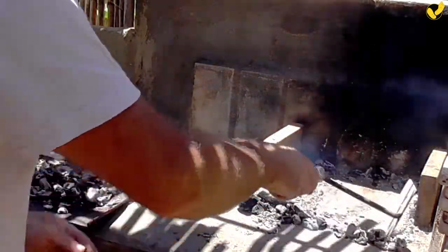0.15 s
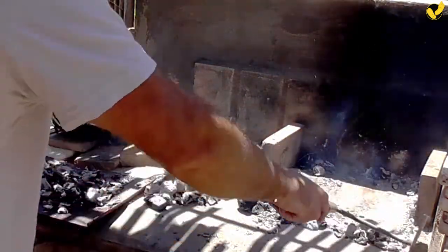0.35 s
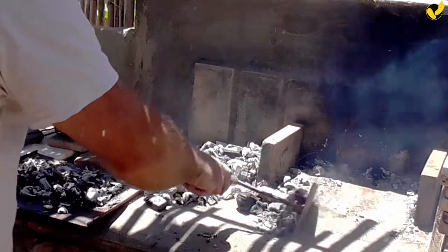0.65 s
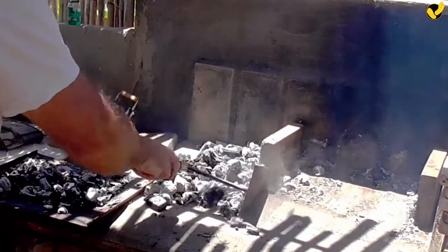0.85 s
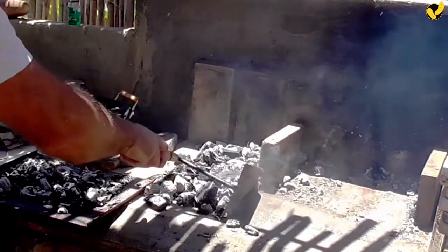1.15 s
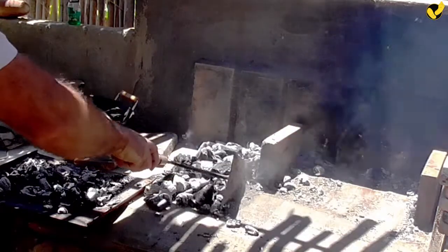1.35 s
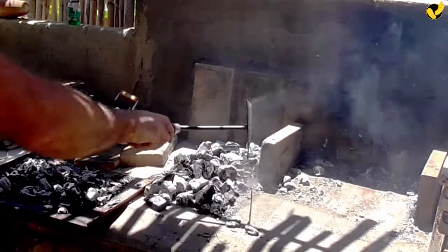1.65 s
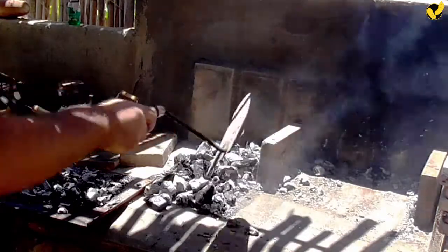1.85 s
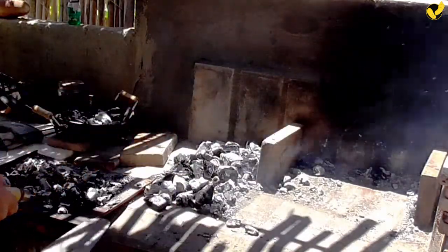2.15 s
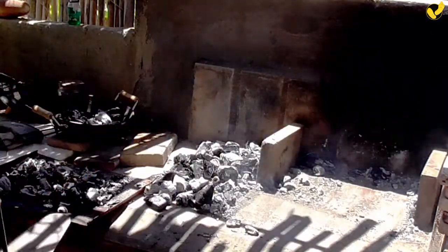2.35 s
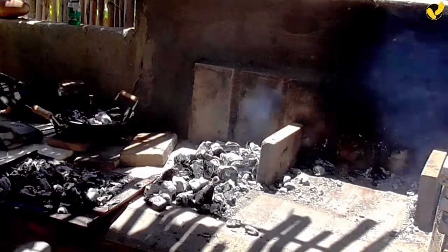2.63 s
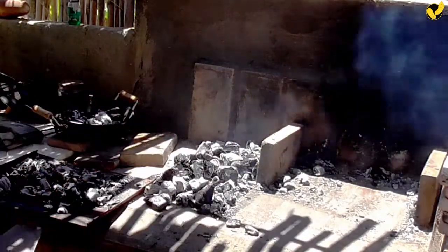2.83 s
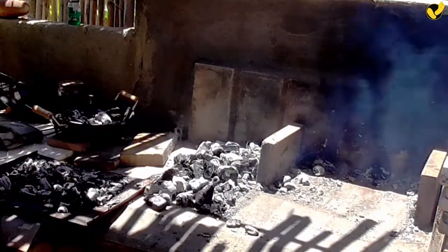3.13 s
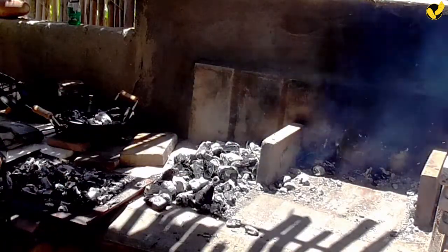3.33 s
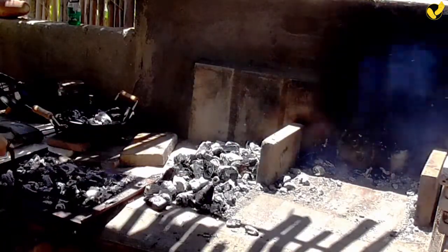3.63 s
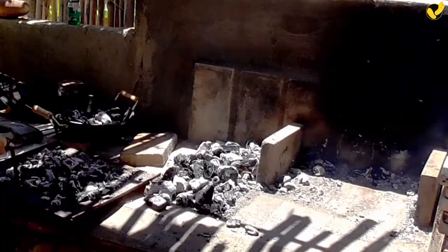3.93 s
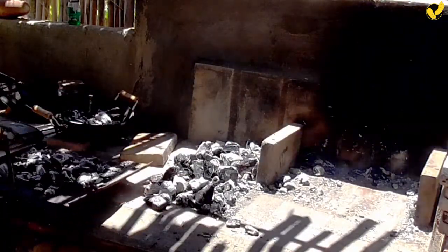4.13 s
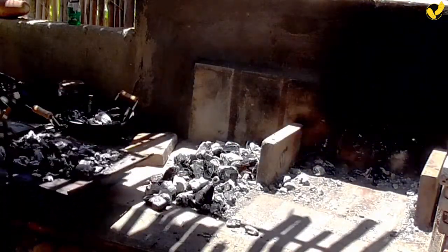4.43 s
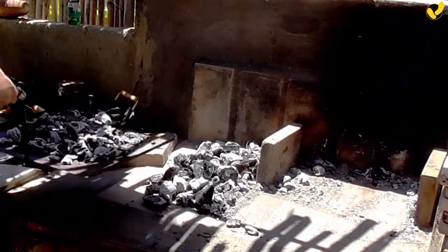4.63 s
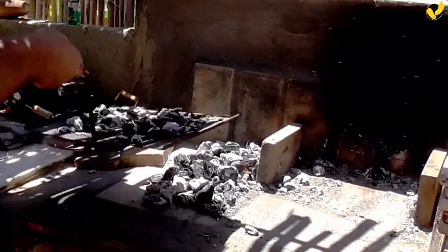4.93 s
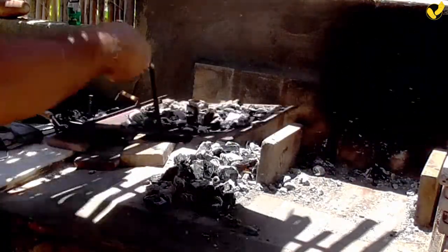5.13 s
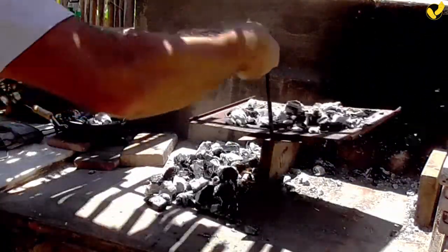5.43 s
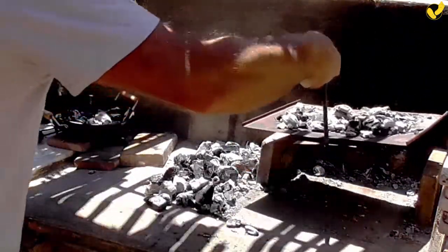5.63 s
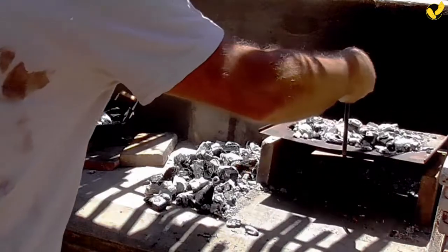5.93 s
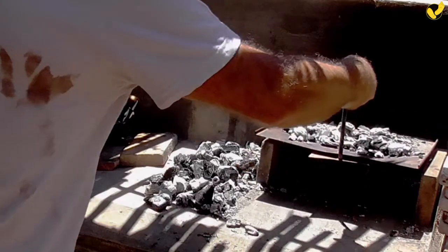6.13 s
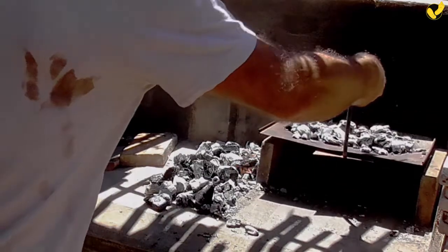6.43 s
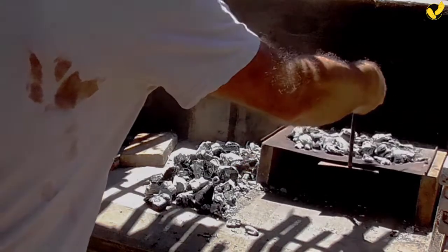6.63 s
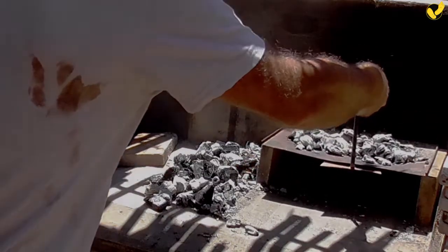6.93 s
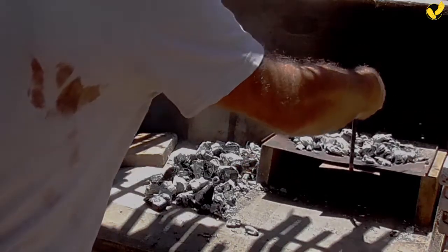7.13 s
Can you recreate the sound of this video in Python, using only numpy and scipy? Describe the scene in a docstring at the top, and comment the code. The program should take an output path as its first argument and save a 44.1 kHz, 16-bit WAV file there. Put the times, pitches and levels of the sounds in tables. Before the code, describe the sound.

Close stereo sound of a charcoal hearth outdoors, with very short diffuse reflections from brick walls. Sharp, dry coal pops of varied size run throughout, over fine ticking crackle and faint ember hiss. From 0.4 to 1.0 s a steel blade scrapes over gritty masonry, uneven, rasping and ringing, with brief squeaky tones. Pops continue alone until about 2.2 s, when the hoe is laid down with a bright clank, followed by a faint drag to 2.7 s. From 3.0 to 3.9 s it slides aside in small scrapes and clinks. Crackling surges near 4.0 s and is densest from 4.7 to 5.5 s, with short gas spits, then thins. At 6.3-6.75 s a steel tray meets bricks: dull low knocks and a short grating push. Sparse pops finish. A quiet, wavering mid-low machine hum and soft yard rumble sit beneath everything.

```python
"""Burning charcoal pops and crackles on a brick hearth outdoors: each pop is a sharp spike with its own echo, the
crackles are random ticks over hiss, and split coals spit jets of shaped noise.
A steel hoe is dragged over the hearth, laid down and slid aside, and a steel tray is set on two bricks: grit and
pushes ring their modes. The hearth walls answer crackles and steel with a diffuse tail.
A machine hums nearby on two tones and a noise drone, over a dull rumble from the yard."""
import sys
import numpy as np
from scipy import signal
from scipy.fft import rfft, irfft, next_fast_len
from scipy.io import wavfile
from scipy.ndimage import map_coordinates

SR = 44100
rng = np.random.default_rng(int(sys.argv[2]) if len(sys.argv) > 2 else 0)


def master_out(mix):
    """Clip the mix to full scale and print it as 16-bit PCM to the path in sys.argv[1]."""
    frames = np.transpose(np.atleast_2d(mix))
    ceiling = np.clip(frames, -1, 1)
    pcm = np.round(ceiling * 32767).astype(np.int16)
    wavfile.write(sys.argv[1], SR, pcm)


N = 320607

# Outdoor rumble, relative spectrum: pitch_hz, level_db (per Hz)
YARD_SPECTRUM = [(12, -53), (20, -26.5), (71, -9), (201, -8.5), (292, -1.5), (436, -4), (487, -7),
                 (556, -12), (1320, -23), (1760, -35), (2060, -26.5), (2810, -36.5), (4000, -32),
                 (5200, -67), (8800, -120)]
YARD_DB = -45  # rms
# Machine: time_s, lower_tone_db, upper_tone_db, housing_drone_db
HUM_LEVELS = [(0.0, -56, -51, -48), (0.58, -54, -51, -52.5), (1.07, -66, -49.5, -45.5),
              (1.88, -51.5, -51.5, -44.5), (2.81, -58, -54.5, -46.5), (5.51, -43.5, -55, -44.5),
              (6.76, -48.5, -54.5, -47), (7.27, -46, -58, -47)]

# Likeness of the two microphones: pitch_hz, correlation (0 to 1)
LIKENESS = [(60, 0.72), (180, 0.94), (550, 0.42), (1650, 0.55), (4970, 0.27), (15000, 0.041)]
# Colour difference of the microphones: pitch_hz, left_minus_right_db
MIC_TILT = [(60, -1), (180, -2), (550, 2.5), (1650, -0.5), (4970, 0), (15000, -3)]
TOP_HZ = 16800  # band limit
# Decay of the hearth walls: pitch_hz, t60_s
WALL_DECAY = [(500, 0.06), (2500, 0.049), (7000, 0.1), (15000, 0.082)]

# Steel modes, relative: pitch_hz, width_hz, level_db
BLADE_ON_EDGE = [(2547, 34, -3), (3020, 18, -2.5), (3230, 10, -12), (3580, 19, -11), (3880, 18, -1),
                 (4624, 16, 2), (5310, 28, 0), (5460, 16, 3), (6680, 33, -4), (7700, 32, 1), (8800, 31, 1),
                 (9200, 58, -6)]
BLADE_FLAT = [(1342, 67, -3.5), (2176, 26, -8), (2980, 29, -40), (3570, 29, -3), (4560, 30, -1),
              (5210, 54, -4), (5900, 57, -20), (7830, 250, 5.5), (8790, 33, -1), (9650, 25, -3),
              (9350, 43, 4)]
TRAY_MODES = [(252, 44, -7.5), (416, 106, 2), (570, 130, 3), (930, 320, 4), (1160, 150, -7)]
# Rasp of grit under steel, relative spectrum: pitch_hz, level_db (per Hz)
GRIT_SPECTRUM = [(180, -22), (300, -11), (549, -10), (1130, -9.5), (1230, -10), (1630, -17), (9020, -17),
                 (14700, -21), (15700, -50), (16500, -75)]
# Strokes of moving steel, before the steel trim: time_s, lows_db, treble_db
RAKE_STROKE = [(.399, -24.5, -35), (.458, -53, -44), (.488, -33.5, -42.5), (.535, -28, -30.5),
               (.56, -32.5, -33.5), (.575, -29, -30.5), (.61, -30, -34.5), (.652, -24, -36.5),
               (.742, -33.5, -35.5), (.8, -44.5, -49.5), (.845, -39.5, -36), (.878, -43, -40.5),
               (.888, -35, -37.5), (.93, -46, -50.5), (1.02, -69, -69)]  # blade dragged over the hearth
DROP_STROKE = [(2.205, -50, -53), (2.212, -38, -32), (2.228, -46, -43), (2.24, -25.5, -25.5),
               (2.275, -29, -28.5), (2.345, -36.5, -42.5), (2.42, -54, -60)]  # hoe laid down
DRAG_STROKES = [
    [(2.42, -46, -61), (2.51, -54, -50), (2.61, -49, -60), (2.72, -72, -65)],
    [(2.98, -63, -50), (2.998, -30.5, -33.5), (3.036, -51, -49), (3.056, -35, -41), (3.1, -44, -47),
     (3.2, -41.5, -39), (3.3, -39, -38.5), (3.412, -44.5, -44), (3.48, -55.5, -62), (3.56, -46, -41.5),
     (3.66, -41.5, -40.5), (3.716, -44, -49), (3.78, -31, -36), (3.87, -48, -55), (3.92, -72, -66)],
]  # hoe slid aside, a list for each stroke
SLIDE_STROKES = [
    [(6.4, -44, -53), (6.435, -51, -53.5), (6.45, -65, -63)],
    [(6.622, -55, -60), (6.628, -34, -33.5), (6.66, -37.5, -42.5), (6.69, -36, -41), (6.715, -41.5, -54),
     (6.735, -51, -37), (6.76, -67, -66)],
]  # tray pushed over the bricks, a list for each stroke
# Steel meets brick: start_s, relative level_db, contact_ms
BRICK_KNOCKS = [(.402, -29, 1.4), (3.097, -26, 1.2), (6.341, -22, 1.02), (6.402, -17.5, 1.67),
                (6.6271, -18.5, 0.8), (6.6416, -21, 1.65), (6.677, -30, 1.4), (6.7252, -14.5, 0.88),
                (6.7328, -34, 1.2)]
THUMP = 0.29  # share of the push itself, beside a ring of peak 1
# Modes of the hoe that sing out: pitch_hz, width_hz
SINGING_MODES = [(545, 33), (760, 25), (835, 55), (1242, 13.8), (1560, 8), (1744, 11), (8780, 36)]
# Catches of the edge, a list for each singing mode, before the steel trim: start_s, level_db, hold_s
EDGE_CATCHES = [
    [(.622, -29.5, 0.064), (.93, -42.5, 0.019)],
    [(0.546, -38, .06)],
    [(2.24, -28.5, 0.034), (2.275, -30.5, .04), (2.43, -39.5, .015), (2.45, -39.5, 0.017),
     (2.55, -42, 0.035), (2.6, -37, 0.013), (2.998, -32.5, 0.0041), (3.056, -31.5, .012),
     (3.29, -39.5, 0.039), (3.4, -44.5, 0.04), (3.56, -44.5, .03), (3.6, -41, 0.02), (3.652, -34, 0.011),
     (3.69, -38, .008), (3.77, -34.5, 0.016)],
    [(.4, -31, 0.0052), (.486, -34, .01), (.522, -32, .015), (.569, -25.5, 0.038), (.688, -40, .006),
     (.884, -32, 0.015), (.94, -48, 0.023)],
    [(0.882, -40, 0.075)],
    [(0.487, -37, 0.074)],
    [(2.24, -34, .02), (2.272, -34, .012)],
]
SWELL_DB_PER_S, FADE_DB_PER_S = 3500, 500
LOCKED = 0.73  # power share of the singing that stick and slip turns into a tone
STEEL_DRY_DB, STEEL_WALLS_DB = -2.0, -2.5  # steel trim in the mix

# Small crackles: time_s, level_db (rms)
CRACKLE_LEVELS = [(0, -51), (.3, -66), (.4, -60), (.95, -58), (1.114, -52), (1.508, -45), (1.76, -57),
                  (2.146, -54.5), (2.4, -49), (2.764, -49.5), (2.97, -51.5), (3.9, -51.5), (4.0, -41.5),
                  (4.22, -52.5), (4.6, -58), (4.93, -43.5), (5.07, -42.5), (5.19, -51.5), (5.37, -46.5),
                  (5.55, -50.5), (6.35, -59), (7.27, -51)]
# Colour laid over crackles and hiss, relative: pitch_hz, level_db
CRACKLE_COLOUR = [(530, 3.5), (900, 4), (1520, 2), (1740, -8.5), (5130, 0), (5790, -1.5), (11900, 0.5),
                  (14800, -5.5), (16500, -72)]
# Gas jets from split coals: start_s, level_db, length_ms, low_part_db (relative)
GAS_JETS = [(3.37, -28.5, 15, -2), (3.968, -30.5, 19.5, -6), (4.262, -40, 11, -18),
            (4.7896, -28.5, 6.3, -24), (5.093, -36, 12, -12), (6.078, -39, 7.5, 9), (7.143, -39, 9.5, -20),
            (7.215, -35.5, 16, -31)]
# Bursting coals: start_s, spike_db (peak, before panning), body_db (relative to the snap), echo_db (relative to the spike)
COAL_BURSTS = [(.0197, -9.5, -22, -20), (.1946, -27, -2, -8), (.265, -12, -28, -19.5), (.284, -8, -20, -27),
               (0.3192, -13.5, -3, -20.5), (0.4005, -10.5, 0.5, -9.5), (.424, -9, -17, -17.5),
               (.5332, -15.5, -3, -16), (0.658, -20, 16, -14), (.6906, -19, 20, -16),
               (.77, -3.5, -7.5, -18.5), (0.775, -13, 3, -30), (0.883, -24.5, -27, -5),
               (0.961, -20, -4, -24), (1.039, -14.5, -29, -38), (1.076, -23.5, -9, -19),
               (1.1238, -19.5, -20, -37), (1.139, -28.5, 1, -9), (1.2005, -13.5, -11, -27),
               (1.424, -30, 5, -7.5), (1.461, -18, -29, -39), (1.505, -17.5, -23, -26),
               (1.6274, -12.5, -8, -17), (1.656, -21, -22, -38), (1.7098, -12, -5.5, -25.5),
               (1.7846, -15, -16, -29), (1.7993, -18.5, -3, -9.5), (1.9021, -10, -22, -26.5),
               (1.9172, -17, 2, -13), (2.0934, -9.5, -10, -22), (2.21, -11, -4, -15), (2.2394, -19, -5, -8),
               (2.2989, -10, -16, -22), (2.4495, -6, -22, -27), (2.5579, -24, -1, -9.5),
               (2.5795, -17, 3, -21), (2.6095, -20, 8, -21), (2.6271, -5, -1.5, -21.5),
               (2.662, -12, -9, -23), (2.698, -18.5, -11, -19), (2.738, -20.5, -6, -20),
               (2.7711, -22, -4, -12.5), (2.8184, -9, -8, -23), (2.8494, -18.5, -16, -23),
               (2.9137, -20.5, -16, -32), (2.9644, -14.5, -17, -25), (2.9974, -14, 10, -16),
               (3.0206, -9, -13, -18), (3.0803, -12, -11, -40), (3.0977, -6, -22, -23),
               (3.147, -9.5, -9, -25), (3.166, -18.5, -11, -20), (3.2072, -11, -8, -17),
               (3.2392, -9, -17, -21.5), (3.3728, -17.5, 6, -6.5), (3.5558, -9, -13, -29),
               (3.6637, -18, 1, -4.5), (3.8213, -8.5, -9, -18.5), (3.877, -21, 0, -22),
               (3.97, -20.5, 4, -8), (3.9854, -9, -17, -27), (4.0429, -16, -5, -10), (4.0874, -8, -16, -23),
               (4.177, -4.5, -11, -26), (4.1983, -24, -26, -30), (4.4005, -15.5, 1, -28),
               (4.419, -26, -17, -15), (4.4604, -23.5, -16, -21), (4.5319, -6.5, -8, -21),
               (4.5574, -17, -6, -20.5), (4.572, -22, -1, -30), (4.6075, -6.5, -8, -22),
               (4.6527, -22.5, -7, -18.5), (4.7276, -30, -12, -14), (4.7385, -13.5, -15, -17.5),
               (4.7823, -19.5, -17, -6.5), (4.7875, -15, 4, -3.5), (4.7928, -20, -17, -13),
               (4.851, -30, -20, -12.5), (4.8894, -20, -3, -14), (4.894, -12.5, -10, -20),
               (4.9108, -19, 4, -16), (4.9195, -20, -8, -15.5), (4.9334, -16, -3, -17),
               (4.9642, -18.5, -8, -13), (4.9817, -19, -9, -14), (5.0209, -19, -1, -14),
               (5.045, -16.5, -12, -25), (5.0583, -19.5, -2, -10.5), (5.069, -11.5, -15, -26),
               (5.162, -21, -13, -19), (5.188, -26, -14, -10), (5.224, -19, -5, -19),
               (5.2891, -14.5, -21, -24), (5.3564, -20.5, -1, -15.5), (5.3932, -19.5, -18, -20.5),
               (5.4514, -14.5, 8, -24), (5.464, -14.5, -2, -19), (5.493, -13, -7, -25),
               (5.5196, -21.5, 6, -21), (5.5375, -20, -4, -22), (5.7373, -26, -8, -4),
               (5.8112, -23, -12, -24), (5.8466, -28.5, -10, -13.5), (5.8804, -23.5, -7, -21),
               (5.97, -19.5, 1, -7.5), (5.974, -11, 0, -26), (6.003, -19.5, -10, -14),
               (6.0785, -13.5, -11, -10), (6.0937, -11, -15, -18), (6.211, -29, -10, -6.5),
               (6.341, -35.5, 8, -6), (6.355, -22, -14, -20), (6.567, -26, -29, -11.5),
               (6.6288, -21.5, 16, -10.5), (6.7311, -16.5, -14, -6), (6.7367, -8.5, -19, -19.5),
               (6.795, -35, -10, -7), (6.954, -19.5, -19, -23), (7.0119, -30, -14, -16),
               (7.0997, -12, -15, -27), (7.2153, -27, 12, -6.5)]
# Colour of a pop, relative: pitch_hz, level_db, share of body_db added (0 to 1)
SNAP_COLOUR = [(500, -3, 0.8), (1840, -6.5, 0.97), (3820, -2.5, 0.3), (7900, 0.5, .01), (11660, 2, 0.37),
               (15500, -7, 0.23), (16500, -40, .2)]
# Echo after a pop: pitch_hz, t60_s
POP_ECHO_DECAY = [(1000, 0.099), (2500, 0.086), (7000, 0.091), (15000, 0.089)]
COLOUR_SCATTER_DB, POP_PAN_DB = 4, 0.3  # random colour from pop to pop; left over right in every spike


def amp(db):
    """dB to gain."""
    return 10 ** (np.asarray(db) / 20)


def unit(x):
    """Scaled to rms 1."""
    return x / np.sqrt(np.mean(x ** 2) + 1e-20)


def along(points, hz):
    """Reads (pitch_hz, value) points on a log pitch axis."""
    f, v = np.transpose(points)
    return np.interp(np.log(hz + 1), np.log(f + 1), v)


def gains(*tables):
    """Gain per sample for each dB column, summed over the tables; silent outside them."""
    t = np.arange(N) / SR
    total = 0
    for table in tables:
        time_s, *columns = np.transpose(table)
        total = total + np.array([amp(np.interp(t, time_s, db, -200, -200)) for db in columns])
    return total


def wobble(rate):
    """A wandering curve: straight lines between random knots, rate knots a second."""
    knots = rng.standard_normal(int(N * rate / SR) + 4)
    return map_coordinates(knots, [np.arange(N) * rate / SR], order=1)


def filtered(x, response):
    """x shaped by a response of frequency."""
    m = next_fast_len(N + 8192)
    return irfft(rfft(x, m) * response(np.fft.rfftfreq(m, 1 / SR)), m)[..., :N]


def low_cut(x, cut_hz):
    """Rolls off the bass below cut_hz."""
    return filtered(x, lambda hz: 1 / (1 + (cut_hz / (hz + 1)) ** 4))


def pair(a, b):
    """Two unrelated signals mixed to the likeness of the two microphones."""
    def weights(hz):
        turn = np.arccos(np.clip(along(LIKENESS, hz), 0, 1)) / 2
        return np.array([np.cos(turn), np.sin(turn)])

    mid, side = filtered(np.array([a, b]), weights)
    return np.array([mid + side, mid - side])


def grains(rate, spread_db):
    """Random one-sample impacts, rate a second, a few much stronger than the rest."""
    hits = rng.random(N) < rate / SR
    strength = amp(spread_db * np.minimum(rng.exponential(size=N), 3))
    return hits * strength * rng.standard_normal(N)


def mode(x, hz, width):
    """x through one resonance."""
    return signal.lfilter(*signal.iirpeak(hz, hz / width, SR), x)


def dying(decays, size):
    """Two noises in which each frequency dies at its own speed; starts at rms 1."""
    hz, t, z = signal.stft(rng.standard_normal((2, size)), SR, nperseg=64)
    fade = amp(-60 * t / along(decays, hz)[:, None])
    return signal.istft(z * fade, SR, nperseg=64)[1][:, :size]


def yard():
    """Dull outdoor rumble: shaped noise that wavers slowly."""
    noise = pair(*(amp(0.96 * wobble(4.9)) * rng.standard_normal((2, N))))
    return amp(YARD_DB) * unit(filtered(noise, lambda hz: amp(along(YARD_SPECTRUM, hz))))


def machine():
    """Two wavering motor tones of fixed pitch and the fuzzy drone of the housing, noise peaked at 298 Hz."""
    t = np.arange(N) / SR
    lower_gain, upper_gain, drone_gain = gains(HUM_LEVELS)
    lower = lower_gain * amp(1.3 * wobble(8)) * np.sin(2 * np.pi * 393.8 * t)
    upper = upper_gain * amp(2.25 * wobble(9.8)) * np.sin(2 * np.pi * 490.2 * t)
    housing = filtered(pair(*rng.standard_normal((2, N))), lambda hz: 1 / (1 + ((hz - 298) / 14) ** 2))
    return np.sqrt(2) * (lower + upper) + drone_gain * unit(housing)


def walls(x):
    """The diffuse answer of the hearth walls: a decaying noise tail, new every tenth of a second."""
    out, step, delay = np.zeros((2, N + SR)), SR // 10, 40  # samples
    for i in range(0, N, step):
        tail = dying(WALL_DECAY, size=6000)
        wet = signal.fftconvolve(x[None, i:i + step], tail / np.linalg.norm(tail[0]), axes=1)
        out[:, i + delay:i + delay + wet.shape[1]] += wet
    return pair(*out[:, :N])


def knocks():
    """A short soft push sets off damped low modes of the steel."""
    out, t = np.zeros(N + SR), np.arange(4096) / SR
    for start_s, db, contact_ms in BRICK_KNOCKS:
        push = np.sin(np.pi * np.clip(t * 1000 / contact_ms, 0, 1)) ** 2
        ring = 0
        for hz, width, level in TRAY_MODES:
            ring = ring + amp(level + rng.normal(0, 1.1)) * mode(push, hz, width) * 150 / width
        hit = ring / np.abs(ring).max() + THUMP * push
        out[round(start_s * SR):][:len(t)] -= amp(db + 2.0) * hit
    return low_cut(out[:N], 110)


def gritty():
    """Dense uneven impacts of grit under steel."""
    return unit(amp(2.0 * wobble(60) + 2.6 * wobble(200)) * grains(9000, spread_db=3))


def scrape(modes, strokes, split_hz, ring, restless_db, count=40, minor_db=-8):
    """Grit under moving steel rings its modes; the contact wanders, so each mode swells alone."""
    grit = gritty()
    minor_hz = np.exp(rng.uniform(np.log(1300), np.log(13000), count))
    minor = [(hz, 35, minor_db) for hz in minor_hz]  # the many weak modes of a plate
    tones = 0
    for hz, width, db in [*modes, *minor]:
        restless = grit * amp(restless_db * wobble(34))
        tones = tones + amp(db) * mode(restless, hz, width) / np.sqrt(width)
    rasp = filtered(grit, lambda hz: amp(along(GRIT_SPECTRUM, hz)))
    sound = ring * unit(tones) + unit(rasp)
    low = filtered(sound, lambda hz: 1 / (1 + (hz / split_hz) ** 4))
    low_gain, high_gain = gains(*strokes)
    return low_gain * unit(low) + high_gain * unit(sound - low)


def singing():
    """Each catch of the edge makes one mode swell fast, hold and fade; its pitch wanders inside its width."""
    grit, t, out = gritty(), np.arange(N) / SR, 0
    for (hz, width), catches in zip(SINGING_MODES, EDGE_CATCHES):
        swell = 0
        for start_s, db, hold_s in catches:
            rise_db = SWELL_DB_PER_S * np.maximum(start_s - t, 0)
            fade_db = FADE_DB_PER_S * np.maximum(t - start_s - hold_s, 0)
            swell = swell + amp(db - rise_db - fade_db)
        phase = 2 * np.pi * np.cumsum(hz + .4 * width * wobble(45)) / SR
        locked = amp(2.5 * wobble(70)) * np.sin(phase)
        loose = mode(grit, hz, width)
        out = out + swell * (np.sqrt(LOCKED) * unit(locked) + np.sqrt(1 - LOCKED) * unit(loose))
    return out


def crackle():
    """Countless small cracks come in clumps over the hiss of the embers."""
    ticks = unit(amp(4.3 * wobble(30)) * grains(450, spread_db=6))
    hiss = pair(*(amp(1.45 * wobble(20)) * rng.standard_normal((2, N))))
    sway = amp(2.2 * wobble(45) * [[1], [-1]])  # ticks wander between left and right
    both = .5 * ticks * sway + 0.82 * walls(ticks) + 0.57 * hiss
    return gains(CRACKLE_LEVELS) * unit(filtered(both, lambda hz: amp(along(CRACKLE_COLOUR, hz))))


def spits():
    """A split coal vents a short, rough jet of gas that starts at once, then drops 6 dB and trails off."""
    out, t = np.zeros((2, N + SR)), np.arange(4096) / SR
    hz = np.fft.rfftfreq(len(t), 1 / SR)
    for start_s, db, length_ms, low_db in GAS_JETS:
        length_s = length_ms / 1000
        jet = amp(-60 * np.clip(t - length_s, 0, 1) / 0.069 - 6 * (t > length_s))
        rough = amp(1.6 * np.repeat(rng.standard_normal(256), 16)) * rng.standard_normal((2, len(t)))
        curve = [(400, low_db - 19), (1500, low_db), (4000, -7.5), (9000, 2), (13000, -6.5), (16500, -38)]
        colour = amp(along(curve, hz))
        out[:, round(start_s * SR):][:, :len(t)] += amp(db) * jet * irfft(rfft(rough) * unit(colour))
    return pair(*out[:, :N])


def pops():
    """Each burst is one sharp pressure spike, fuller for a bigger coal; echoes and splinters build up behind it."""
    spikes, echoes, t = np.zeros((2, N + SR)), np.zeros((2, N + SR)), np.arange(4096) / SR
    hz = np.fft.rfftfreq(len(t), 1 / SR)
    lead = 128  # samples of room ahead of the spike
    pan = amp([[POP_PAN_DB / 2], [-POP_PAN_DB / 2]])
    for start_s, db, body_db, echo_db in COAL_BURSTS:
        curve = [(f, level + share * body_db + COLOUR_SCATTER_DB * rng.normal()) for f, level, share in SNAP_COLOUR]
        colour = amp(along(curve, hz))
        colour = colour / colour.mean()
        # tiny random offset in time between the microphones
        arrival = lead / SR + rng.normal(0, 1e-5) * np.array([[1], [-1]])
        spike = irfft(colour * np.exp(-2j * np.pi * hz * arrival - .8j))
        spike = spike + 0.67 * np.roll(spike, rng.integers(4, 14), axis=1)  # the brick below doubles it
        lumps = amp(2.17 * np.repeat(rng.standard_normal(128), 32))  # separate early reflections
        build_up = 1 - np.exp(-t / 0.00031)
        echo = irfft(rfft(lumps * build_up * dying(POP_ECHO_DECAY, size=4096)) * unit(colour))
        i = round(start_s * SR)
        spikes[:, i - lead:i - lead + len(t)] += amp(db) * spike / np.abs(spike).max() * pan
        echoes[:, i:i + len(t)] += amp(db + echo_db) * echo
    return spikes[:, :N] + pair(*echoes[:, :N])


def scene():
    """Coals and steel inside the hearth walls, over the hum and the yard."""
    rake = scrape(BLADE_ON_EDGE, [RAKE_STROKE], split_hz=3300, ring=1.0, restless_db=7, count=34, minor_db=-5)
    drop = scrape(BLADE_FLAT, [DROP_STROKE], split_hz=4700, ring=0.97, restless_db=4, count=22, minor_db=-4)
    drag = scrape(BLADE_FLAT[:3], DRAG_STROKES, split_hz=3050, ring=0.38, restless_db=3.5, count=12, minor_db=-8.5)
    tray = scrape(TRAY_MODES, SLIDE_STROKES, split_hz=1700, ring=1.1, restless_db=-0.5, count=0)
    steel = rake + drop + drag + tray + singing() + knocks()
    steel_in_hearth = amp(STEEL_DRY_DB) * steel + amp(STEEL_WALLS_DB) * walls(steel)
    hearth = steel_in_hearth + pops() + spits() + crackle()
    return low_cut(hearth, 120) + machine() + yard()  # small bodies radiate no bass


def record(dry):
    """The two microphones differ a little in colour; nothing is kept above the band limit."""
    sides = np.array([[.5], [-.5]])
    return filtered(dry, lambda hz: amp(sides * along(MIC_TILT, hz)) * (hz < TOP_HZ))


dry = scene()
out = record(dry)
master_out(out)
```